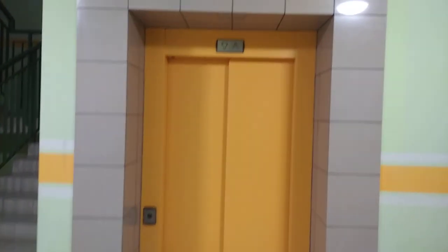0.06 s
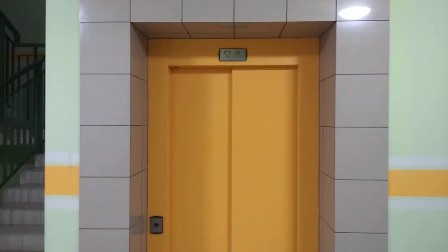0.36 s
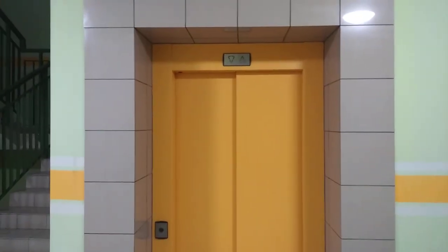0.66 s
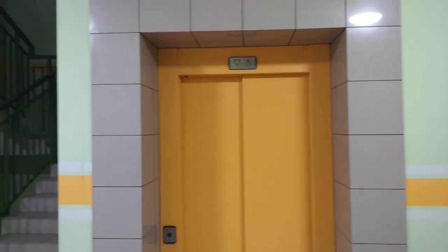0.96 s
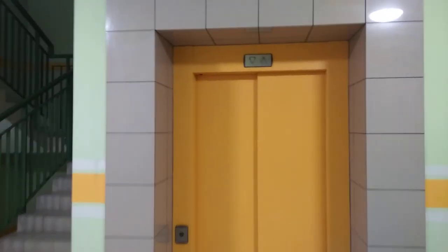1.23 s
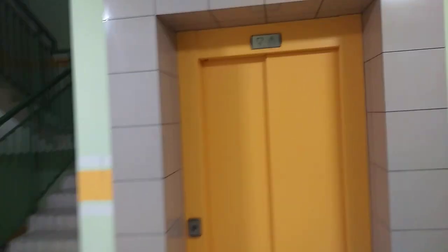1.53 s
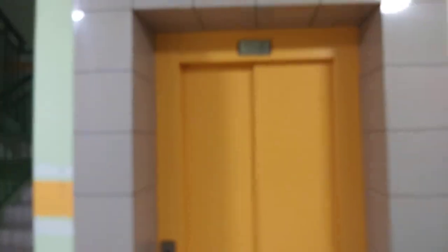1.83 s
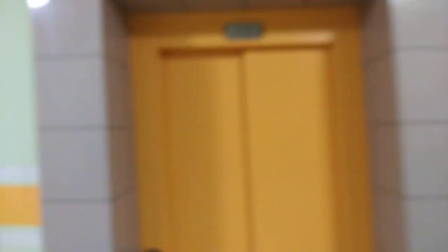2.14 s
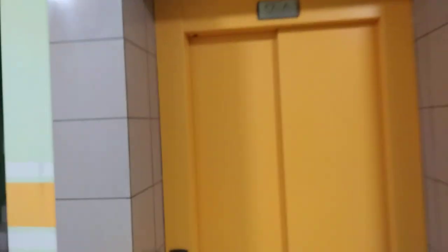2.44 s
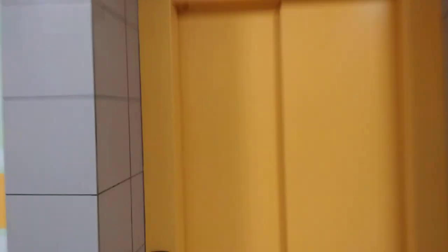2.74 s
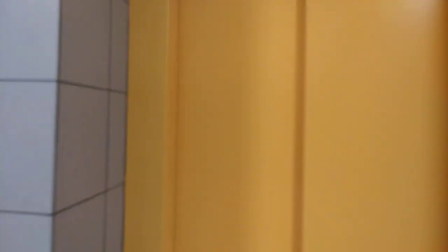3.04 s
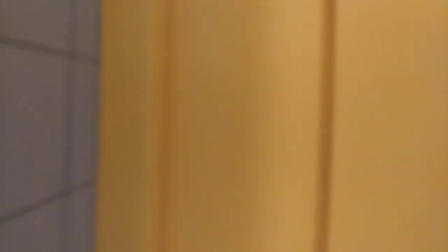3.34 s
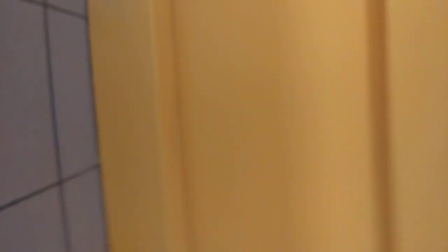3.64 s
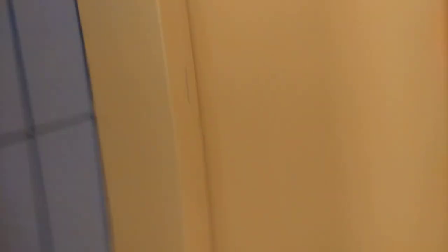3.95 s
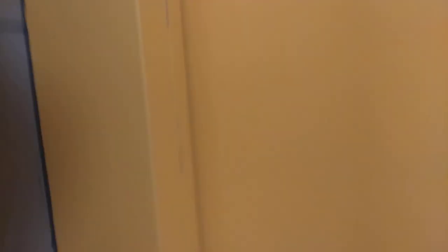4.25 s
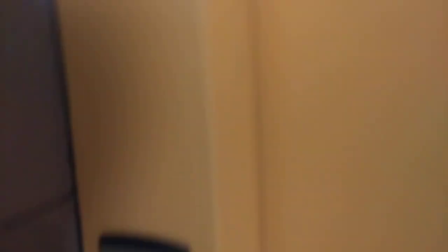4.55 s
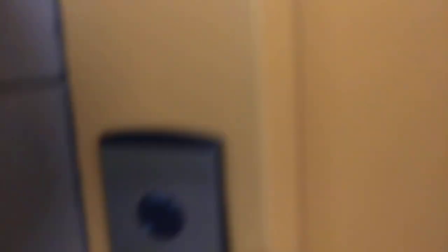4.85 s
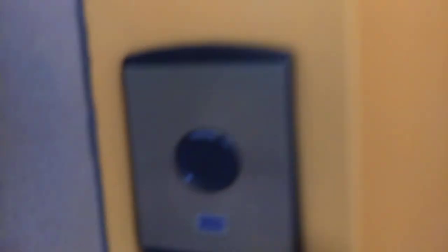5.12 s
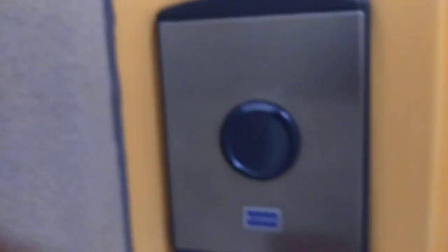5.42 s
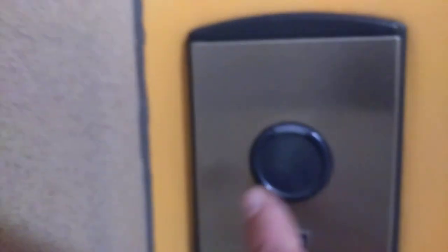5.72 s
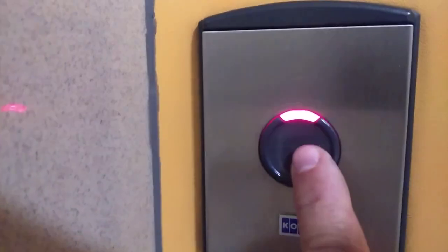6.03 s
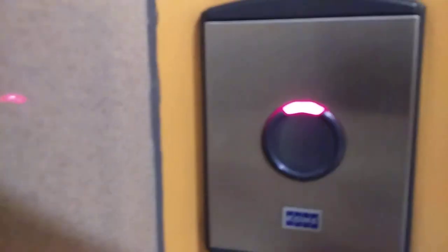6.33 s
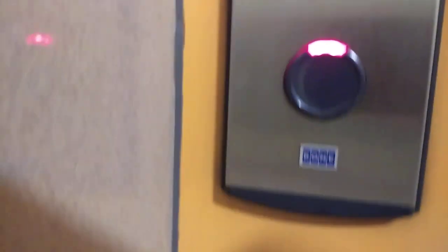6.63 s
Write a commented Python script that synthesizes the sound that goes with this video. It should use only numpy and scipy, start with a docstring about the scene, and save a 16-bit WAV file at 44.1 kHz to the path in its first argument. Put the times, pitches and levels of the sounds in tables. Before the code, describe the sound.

Soft footsteps and rustling clothes, a door banging shut in an echoing stairwell, then a lift button clicking in and out.

```python
"""Door and lift in a tiled stairwell lobby

A hand-held case with two microphone ports is carried up to a lift: shoes thud and scuff, clothes
rustle, fingers tick on the case. A latch strikes, a door bangs shut and the stairwell reverberates.
The call button clicks in and out, and the steel lift frame booms behind it. Impacts are shaped
noise bursts, ringing bodies are sums of damped modes, and friction is modulated noise."""
import sys
import numpy as np
from scipy import signal
from scipy.fft import rfft, irfft, next_fast_len
from scipy.io import wavfile
from scipy.ndimage import uniform_filter1d, map_coordinates

SR = 44100
rng = np.random.default_rng(int(sys.argv[2]) if len(sys.argv) > 2 else 0)


def transcribe(u):
    """Save the signal u as a 16-bit wav file named by the first command-line argument.

    u: samples, shape (n,) or (channels, n), limited to [-1, 1]; the rate is SR.
    q: integer samples, one column per channel.
    """
    v = np.clip(np.atleast_2d(u).T, -1, 1)
    q = np.round(v * 32767).astype(np.int16)
    wavfile.write(sys.argv[1], SR, q)


N = 298998

# Footfalls. Each row: start in seconds, heel level in dB, heel pitch in Hz, sole level in dB,
# sole lag in seconds, trouser swish in dB.
FOOTFALLS = [(0.105, -60.5, 200, -75, 0.027, -71), (0.209, -57, 210, -62, 0.05, -72),
             (2.034, -55.5, 250, -55, 0.049, -62), (2.582, -53.5, 131, -48.5, 0.012, -56.5),
             (3.313, -49.5, 254, -56.5, 0.00802, -52.5), (4.013, -50, 216, -52, 0.063, -52.5),
             (6.655, -40, 125, -49, 0.012, -54)]
# Fingers on the case. Each row: start in seconds, level, bass and treble in dB, decay time in
# seconds, pitch of the touched spot in Hz, its emphasis in dB.
TOUCHES = [(0.9858, -43, 0.5, -8, 0.011, 520, 10), (0.994, -52, 3, -2, 0.012, 1700, 7),
           (1.156, -32.5, 2, 4, 0.0041, 2700, 11), (1.160, -53.5, 4, -15, 0.043, 160, 9),
           (1.358, -55, 10, -20, 0.036, 170, 16), (1.493, -39, 21, 4, 0.016, 600, 13),
           (1.5407, -24.5, -10, -18, 0.0043, 1500, -1), (2.494, -32, 13.5, 5.5, 0.0041, 3000, 4),
           (2.504, -44.5, -2, 6, 0.003, 3000, 1), (2.579, -41, 9, 12, 0.0022, 3000, -3),
           (4.030, -39, -11, 2.5, 0.07, 13200, 12), (4.259, -41, -8, 0, 0.008, 3000, -2),
           (5.913, -52, 11, 3, 0.073, 7000, -4)]


def amp(db):
    """Amplitude ratio of a level in decibels."""
    return 10 ** (np.asarray(db) / 20)


def unit(x):
    """Normalisation to an rms of 1."""
    return x / np.sqrt(np.mean(x ** 2) + 1e-20)


def along(points, hz):
    """Interpolation of (Hz, value) points on a logarithmic frequency axis."""
    freqs, values = np.transpose(points)
    return np.interp(np.log(hz + 1), np.log(freqs + 1), values)


def bump(hz, centre_hz, width_hz):
    """Lorentzian resonance curve, 1 at its centre."""
    return 1 / (1 + (2 * (hz - centre_hz) / width_hz) ** 2)


def shelved(points, bass_db, treble_db, hz):
    """Shelving: a spectrum in dB with its low and high ends raised or lowered."""
    return along(points, hz) + along([(350, bass_db), (1400, 0), (3000, 0.0084), (7000, treble_db)], hz)


def coloured(x, gain_db):
    """Minimum-phase filtering by the curve gain_db(hz); folding the cepstrum makes it causal."""
    n = x.shape[-1]
    m = 2 * next_fast_len(n // 2 + 2048)
    gain = amp(gain_db(np.fft.rfftfreq(m, 1 / SR)))
    cepstrum = irfft(np.log(gain + 1e-6))
    cepstrum[1:m // 2] *= 2
    cepstrum[m // 2 + 1:] = 0
    return irfft(rfft(x, m) * np.exp(rfft(cepstrum)), m)[..., :n]


def noise(gain_db):
    """Stationary stereo noise of rms 1 with the spectral shape gain_db(hz)."""
    return unit(coloured(rng.standard_normal((2, N)), gain_db))


def wobble(rate):
    """Smooth random modulation: a spline through rate knots a second."""
    knots = rng.standard_normal(int(N * rate / SR) + 4)
    return map_coordinates(knots, [np.arange(N) * rate / SR])


def add(track, start_s, x):
    """Superposition of x on the track from start_s."""
    start = max(round(start_s * SR), 0)
    part = x[..., :max(N - start, 0)]
    track[..., start:start + part.shape[-1]] += part


def burst(colour, rise, t60):
    """Impact noise: a flurry of micro-impacts swells, then decays exponentially; times in seconds."""
    t = np.arange(SR // 2) / SR
    envelope = (1 - np.exp(-(t / rise) ** 2)) * amp(-60 * t / t60)
    envelope /= envelope.max()
    flurry = rfft(envelope * rng.standard_normal((2, len(t))), SR)
    # a hard contact drives all frequencies about evenly; the struck body gives the colour
    power = np.abs(uniform_filter1d(np.abs(flurry) ** 2, size=500, axis=1))
    whitened = irfft(flurry / np.sqrt(power + 1e-12), SR)[:, :len(t)]
    x = coloured(whitened, colour)
    return x / np.linalg.norm(x, axis=1, keepdims=True) * np.linalg.norm(envelope)


def ring(modes, spread_hz, attack):
    """Modal decay: each (Hz, dB, T60 in seconds) is a cluster of close modes that beat as they die."""
    t = np.arange(SR) / SR
    out = np.zeros((2, SR))
    for hz, db, t60 in modes:
        knots = rng.standard_normal((2, 256)) + 1j * rng.standard_normal((2, 256))
        beats = np.array([np.interp(t * spread_hz, np.arange(256), k) for k in knots])
        fade = amp(-60 * t / t60) * (1 - np.exp(-t / attack)) * (1 - t)  # tapered to silence at 1 s
        mode = np.real(beats * np.exp(2j * np.pi * hz * t)) * fade
        mode /= np.linalg.norm(mode, axis=1, keepdims=True)
        out += amp(db) * mode * np.linalg.norm(fade) / np.sqrt(2)
    return out


def tail(t60s, seconds):
    """Diffuse field: a stereo response of about unit energy, each frequency dying at its own rate."""
    hz, t, spectra = signal.stft(rng.standard_normal((2, int(seconds * SR))), SR, nperseg=256)
    decay = amp(-60 * t / along(t60s, hz)[:, None])
    _, response = signal.istft(spectra * decay, SR, nperseg=256)
    return response / np.linalg.norm(response[0])


def in_room(x, lobby_db, stairs_db):
    """Coupled rooms: direct sound, then the lobby's short reverberation and the stairwell's long one."""
    # Reverberation of the two spaces. Each row: frequency in Hz, T60 in seconds.
    lobby_t60 = [(100, 0.33), (400, 0.84), (2500, 0.36), (8000, 0.39), (14000, 0.23)]
    stairwell_t60 = [(100, 2.9), (450, 4.56), (1200, 2.5), (2400, 2.54), (4500, 1.7), (8000, 1.19),
                     (14000, 2.04)]
    response = amp(stairs_db) * tail(stairwell_t60, seconds=2)
    response[:, :SR] += amp(lobby_db) * tail(lobby_t60, seconds=1)[:, :SR]
    response = np.pad(response, ((0, 0), (int(0.005 * SR), 0)))  # reflections come 5 ms late
    response[:, 0] = 1  # direct path
    return signal.fftconvolve(x, response, axes=1)


def hush():
    """Ambient noise: the building's broadband background drifts slowly in level."""
    # Spectrum of the hush. Each row: frequency in Hz, level in dB.
    spectrum = [(15, -78), (25, -43.5), (48, -32), (71, -8.5), (93, -2.5), (115, -2.5), (154, -5),
                (219, -3), (769, -12), (1280, -13.5), (2180, -15), (9520, -29), (13800, -28.5),
                (15000, -44.5)]
    # Resonances in it. Each row: centre in Hz, width in Hz, boost in dB.
    resonances = [(205.5, 24, 0), (4520, 150, 4.5)]
    peaks = lambda hz: sum(db * bump(hz, centre, width) for centre, width, db in resonances)
    return amp(-65 + 0.81 * wobble(rate=1)) * noise(lambda hz: along(spectrum, hz) + peaks(hz))


def whistle():
    """Narrow-band noise: a faint, airy whistle comes and goes."""
    # The whistle's envelope. Each row: time in seconds, level in dB.
    envelope = [(0, -69), (0.45, -74), (0.65, -87), (2.9, -80), (3.35, -66), (3.8, -66), (4.3, -78),
                (6.7, -79.5)]
    times, levels_db = np.transpose(envelope)
    level = amp(np.interp(np.arange(N) / SR, times, levels_db))
    return level * noise(lambda hz: 20 * np.log10(bump(hz, centre_hz=2170, width_hz=320)))


def clothes():
    """Friction noise: fabric rustles through the walk and swells as a leg or a sleeve swings past."""
    # Sleeve swishes. Each row: peak time in seconds, level in dB, Gaussian width in seconds.
    sleeves = [(0.03, -64.5, 0.14), (0.215, -57.5, 0.016), (0.272, -62.5, 0.042), (1.29, -56, 0.063),
               (1.38, -63, 0.072), (3.706, -57.5, 0.055), (3.99, -50, 0.019), (4.268, -54, 0.022),
               (4.59, -48, 0.043), (5.2, -53.5, 0.18), (5.859, -70.5, 0.11), (6.699, -39, 0.011),
               (6.741, -47.5, 0.012)]
    # Spectrum of rubbing fabric. Each row: frequency in Hz, level in dB.
    fabric = [(200, -3.5), (900, 1.5), (1700, 3.5), (2150, 6.5), (2700, 1.5), (4600, 1.5), (5100, -7),
              (7600, 1), (9200, -4), (10800, -10), (14000, -9)]
    t = np.arange(N) / SR
    walk_start_s, walk_end_s, fade_s = 1.17, 6.22, 0.99
    level = amp(-61.5) * np.clip(np.minimum(t - walk_start_s, walk_end_s - t) / fade_s, 0, 1)
    swing_lag_s, swing_width_s = 0.15, 0.14  # the other leg passes after each footfall
    legs = [(start + swing_lag_s, db, swing_width_s) for start, *_, db in FOOTFALLS]
    for peak, db, width in legs + sleeves:
        swell = amp(db) * np.exp(-0.5 * ((t - peak) / width) ** 2)
        level = np.hypot(level, swell)  # incoherent sources add in power
    fibres = rng.standard_normal((2, N)) * amp(0.6 * wobble(rate=350))
    return level * unit(coloured(fibres, lambda hz: along(fabric, hz)))


def shoe_contact(pitch_hz, octaves, rise, t60):
    """Damped impact of a shoe on tiles: one broad spectral hump, reaching octaves to either side."""
    hump = lambda hz: -13 * np.log10(1 + (np.log2((hz + 1) / pitch_hz) / octaves) ** 4)
    colour = lambda hz: hump(hz) + along([(40, -17), (100, 0)], hz)
    return in_room(burst(colour, rise, t60), lobby_db=-6, stairs_db=1)


def grit():
    """Poisson impulses: grains of sand crack at random under a sliding sole."""
    # Spectrum of a cracking grain. Each row: frequency in Hz, level in dB.
    grain = [(200, -9.5), (1500, -3.5), (2800, 0), (3700, 5), (4500, -1.5), (5300, -16), (8000, -15),
             (14000, -29.5)]
    grains_per_s, t60 = 370, 0.11
    t = np.arange(SR // 2) / SR
    cracking = rng.random(len(t)) < grains_per_s / SR
    cracks = cracking * rng.standard_normal((2, len(t))) * amp(-60 * t / t60)
    crunch = coloured(cracks, lambda hz: along(grain, hz))
    crunch *= amp(-9.5) * np.sqrt(t60 * SR) / (np.linalg.norm(crunch) + 1e-9)
    return in_room(crunch, lobby_db=-1, stairs_db=2)


def steps():
    """Impact and sliding friction: a low heel thud, a higher sole slap, at times a scuff over grit."""
    # Sliding shoes. Each row: start in seconds, scrape level in dB, grit level in dB, rise in seconds.
    scuffs = [(2.06, -53, -58, 0.045), (2.758, -46, -43.5, 0.0079), (2.958, -55.5, -66, 0.0035),
              (4.238, -57, -55.5, 0.006), (6.686, -55, -58, 0.006)]
    out = np.zeros((2, N))
    for start, heel_db, pitch_hz, sole_db, lag, _ in FOOTFALLS:
        heel = shoe_contact(pitch_hz, octaves=0.99, rise=0.005, t60=0.11)
        sole = shoe_contact(2.5 * pitch_hz, octaves=0.79, rise=0.0027, t60=0.18)
        add(out, start, amp(heel_db) * heel)
        add(out, start + lag, amp(sole_db) * sole)
    for start, scrape_db, grit_db, rise in scuffs:
        add(out, start, amp(scrape_db) * shoe_contact(pitch_hz=1168, octaves=0.47, rise=rise, t60=0.16))
        add(out, start + 0.009, amp(grit_db) * grit())
    return out


def hollow_ring():
    """Lightly damped resonance: each touch on the case leaves a faint ringing; at times metal pings."""
    # Metallic pings. Each row: start in seconds, level in dB, pitch in Hz, T60 in seconds.
    pings = [(0.9854, -45, 1268, 0.027), (1.1668, -41.5, 1284, 0.043), (6.42, -35, 1197, 0.1)]
    t, level = np.arange(N) / SR, np.zeros(N)
    average_db = np.mean([db for _, db, *_ in TOUCHES])
    hollow_t60 = 7.4
    for start, db, *_ in TOUCHES:
        onset_db = -75 + 0.2 * (db - average_db)  # a harder touch rings a little louder
        decay_db = -60 * np.abs(t - start) / hollow_t60
        level = np.hypot(level, amp(onset_db + decay_db) * (t > start))
    out = level * noise(lambda hz: 20 * np.log10(bump(hz, centre_hz=1217, width_hz=130)))
    for start, db, hz, t60 in pings:
        modes = [(hz, 0, t60), (hz, -19, 0.73)]  # the ping and its lingering tail
        add(out, start, amp(db) * ring(modes, spread_hz=29, attack=0.00042))
    return out


def fingers():
    """Structure-borne sound: the case carries finger ticks and a short rub to the microphone ports."""
    # Spectrum of the touched case. Each row: frequency in Hz, level in dB.
    case = [(30, -12), (150, 1), (330, -1), (600, -3.5), (1300, -4), (4400, -7), (5200, -12), (6200, -9),
            (8500, -7.5), (11000, -19.5), (14500, -12.5)]
    out, t = np.zeros((2, N)), np.arange(N) / SR
    coherence = 0.55  # of a tick at the two ports
    for start, db, bass_db, treble_db, t60, spot_hz, spot_db in TOUCHES:
        spot = lambda hz: spot_db * bump(hz, spot_hz, width_hz=0.7 * spot_hz)
        colour = lambda hz: shelved(case, bass_db, treble_db, hz) + spot(hz)
        # a softer touch is slower to rise as well as to die
        left, independent = amp(db) * burst(colour, rise=0.023 * t60, t60=t60)
        right = coherence * left + np.sqrt(1 - coherence ** 2) * independent
        add(out, start, np.array([left, right]))
    # a fingertip drags ever harder, sliding quietly until the skin catches, then lets go
    catch_s, release_s, swell_s = 1.522, 1.542, 0.037
    drag = np.exp(-np.abs(release_s - t) / swell_s) * (t < release_s)
    drag *= np.where(t > catch_s, 1, amp(-9.5))
    out += amp(-39) * drag * noise(lambda hz: shelved(case, bass_db=-2, treble_db=-6.5, hz=hz))
    # the finger passes right over one port, then moves to the other
    side_db = np.interp(t, [1.2, 1.5, 1.6, 2.4], [0, -13, -11.5, 2.5])
    return out * amp([side_db - abs(side_db) / 2, -side_db - abs(side_db) / 2])


def panel_boom():
    """Low plate modes: big steel panels swell into a hum shortly after a blow."""
    # Booms. Each row: start in seconds, low mode level in dB, high mode level in dB, T60 in seconds.
    booms = [(4.419, -41, -35, 0.68), (4.948, -33, -54, 0.45), (6.112, -28.5, -53, 0.11),
             (6.400, -35, -36, 0.7), (6.47, -53, -33.5, 0.53)]
    low_hz, high_hz = 113, 195
    out = np.zeros((2, N))
    for start, low_db, high_db, t60 in booms:
        modes = [(low_hz, low_db, t60), (high_hz, high_db, t60)]
        add(out, start, ring(modes, spread_hz=10, attack=0.046))
    return out


def shaft_knock():
    """Damped low modes: a dull knock behind the lift doors answers the call."""
    modes = [(302, 3.5, 0.053), (322, -14, 0.42), (191, -12.5, 0.5)]
    out = np.zeros((2, N))
    add(out, 6.696, amp(-28) * ring(modes, spread_hz=12, attack=0.0029))
    return out


def button():
    """Snap action: the switch clicks in and out, exciting its spring, its housing and the lift frame."""
    # Switch contacts. Each row: start in seconds, level, bass, treble and cap clack in dB, decay time
    # in seconds, spring and frame ring in dB, favoured frame pitch in Hz.
    contacts = [(6.12, -38.5, 10, -32, 9, 0.02, -44, -55, 113),
                (6.147, -37.5, 14, -15, -5, 0.042, -45, -48.5, 680),
                (6.157, -32, 17.5, 0.5, 8, 0.029, -34, -49, 660),
                (6.1943, -16, 3, 6.5, 4.5, 0.012, -22, -39.5, 244),
                (6.203, -31.5, 7, -12, -11, 0.057, -40, -43, 1000),
                (6.3658, -23, -19, 8, -1, 0.0097, -25, -52, 1140),
                (6.3685, -14, -25, 2.5, 11.5, 0.011, -17.5, -41.5, 367)]
    # Spectra of the switch and its rattling housing. Each row: frequency in Hz, level in dB.
    switch = [(30, -50), (150, 6.5), (400, -8), (700, 1.5), (1500, 2), (3000, 0.5), (3900, 2.5),
              (4600, -1.5), (5200, -12), (5900, -4.5), (6700, -8), (7400, 6), (8100, 1.5), (9000, -3),
              (10200, -17.5), (12700, -14), (14500, -12)]
    housing = [(30, -32), (150, 7), (400, -0.5), (700, 1), (1300, -1.5), (1900, 0.5), (3200, -2),
               (4600, -5), (5400, -10), (7800, -15), (10200, -22), (14500, -28)]
    # Partials of the spring. Each row: frequency in Hz, level in dB.
    spring_partials = [(3160, 5), (4700, 6.5), (6000, 2), (7380, 7)]
    # Modes of the steel lift frame. Each row: frequency in Hz, level in dB, T60 in seconds.
    frame_modes = [(112.6, -3.5, 1), (195.4, -7, 0.94), (241, -7.5, 0.81), (359, -10, 0.57),
                   (535, -5, 0.35), (595, -1, 0.25), (683, -1, 0.28), (802, -3.5, 0.4), (957, -2.5, 0.28),
                   (1040, -2, 0.35), (1125, -2, 0.32), (1223, 0, 0.32)]
    spring_t60, favour_db = 0.035, 12.5
    spring_modes = [(hz, level, spring_t60) for hz, level in spring_partials]
    out = np.zeros((2, N))
    for start, db, bass_db, treble_db, cap_db, t60, spring_db, frame_db, favoured_hz in contacts:
        # the plastic cap clacks hardest when it flies back against its stop
        cap = lambda hz: cap_db * bump(hz, centre_hz=2470, width_hz=3400)
        snap = burst(lambda hz: shelved(switch, bass_db, treble_db, hz) + cap(hz), rise=0.00055, t60=t60)
        rattle = amp(-15) * burst(lambda hz: along(housing, hz), rise=0.0035, t60=0.13)
        # pushing and letting go each favour different modes of the frame
        driven_modes = [(hz, level + favour_db * bump(hz, favoured_hz, width_hz=80), decay)
                        for hz, level, decay in frame_modes]
        add(out, start, amp(db) * in_room(snap, lobby_db=-19, stairs_db=-24))
        add(out, start, amp(db) * in_room(rattle, lobby_db=-8, stairs_db=-10))
        add(out, start, amp(db + spring_db) * ring(spring_modes, spread_hz=40, attack=0.00076))
        add(out, start, amp(frame_db) * ring(driven_modes, spread_hz=28, attack=0.011))
    return out


def door():
    """Impact excitation: the latch rides over the strike plate; the leaf slams, rebounds and rings."""
    # Door contacts. Each row: start in seconds, level, bass and treble in dB, cutoff in Hz, rise and
    # decay time in seconds, then leaf ring, latch ring, lobby and stairwell reverberation in dB.
    contacts = [(4.416, -23, 2, 0, 8000, 0.00032, 0.057, -28.5, -0.5, -7.5, -6.5),
                (4.6226, -18.5, 2, -11, 9500, 0.0015, 0.044, -40.5, -3, -22, -10),
                (4.6379, -10.5, 1, 3.5, 12500, 0.00033, 0.039, -19.5, -28, -5.5, -8),
                (4.646, -19.5, 4, 4.5, 12500, 0.00034, 0.058, -30.5, -28.5, -7.5, -14)]
    # Spectrum of a blow on the door. Each row: frequency in Hz, level in dB.
    spectrum = [(30, -27.5), (135, -1), (200, 5.5), (275, -0.5), (340, 1.5), (480, 0.5), (620, 0.5),
                (1050, 0.5), (1400, -3), (1850, 2.5), (2400, 4.5), (4650, -1.5), (5050, -9.5), (5800, -6.5),
                (8000, -5), (9800, -8), (10800, -20.5), (13000, -15), (14500, -25)]
    # Modes of the leaf, and of the latch with its plate. Each row: frequency in Hz, level in dB,
    # T60 in seconds.
    leaf_modes = [(203, 3.5, 0.12), (344.6, 5.5, 0.4), (497.3, 4.5, 0.16), (692, -7.5, 0.46),
                  (798, -1, 0.54), (1170, -5.5, 0.51), (1885, -1.5, 0.32), (2285, -2, 0.36),
                  (2540, 1, 0.18), (2730, -1.5, 0.19), (2880, -7, 0.45), (3570, 0.5, 0.2),
                  (3840, -3.5, 0.49), (4670, -1, 0.18), (6540, -7, 0.22), (9300, -7, 0.12)]
    latch_modes = [(622, -19, 0.051), (875, -6, 0.055), (1034, -8, 0.061), (1426, 1, 0.066),
                   (1863, 1.5, 0.034), (2080, 7.5, 0.043), (2490, -4, 0.077), (4490, -3, 0.04)]
    out = np.zeros((2, N))
    for (start, db, bass_db, treble_db, cutoff_hz, rise, t60,
         leaf_db, latch_db, lobby_db, stairs_db) in contacts:
        # a gentler contact reaches less far into the treble
        rolloff = lambda hz: 10 * np.log10(1 + (hz / cutoff_hz) ** 10)
        colour = lambda hz: shelved(spectrum, bass_db, treble_db, hz) - rolloff(hz)
        blow = burst(colour, rise, t60)
        leaf = amp(leaf_db) * ring(leaf_modes, spread_hz=32, attack=0.0025)
        latch = amp(latch_db) * ring(latch_modes, spread_hz=73, attack=0.0015)
        add(out, start, amp(db) * in_room(blow, lobby_db, stairs_db))
        add(out, start, amp(db) * in_room(leaf + latch, lobby_db=-18, stairs_db=-11.5))
        # the metal parts graze just before they meet
        add(out, start - 0.003, amp(db - 21.5) * burst(colour, rise=0.0012, t60=0.014))
    return out


def scene():
    """Spatial coherence: the sources add, and the two close ports hear long waves alike."""
    # Likeness of left and right. Each row: frequency in Hz, coherence from 0 to 1.
    port_coherence = [(150, 0.83), (350, 0.72), (700, 0.35), (1400, 0.061), (12000, 0)]
    impacts = door() + panel_boom() + button() + shaft_knock() + steps()
    left, independent = impacts + clothes() + hollow_ring() + whistle() + hush()
    coherence = along(port_coherence, np.fft.rfftfreq(N, 1 / SR))
    right = irfft(coherence * rfft(left) + np.sqrt(1 - coherence ** 2) * rfft(independent), N)
    return np.array([left, right]) + fingers()


def record(dry):
    """Microphone frequency response: the right port is weak in the bass, and both are band-limited."""
    # Response of the right port. Each row: frequency in Hz, gain in dB.
    right_port = [(40, -27), (110, -13), (340, -15), (470, -0.5), (1000, 0), (2200, -2.5), (4500, 0.5),
                  (8000, 1), (13000, -4)]
    cutoff_hz = 14400
    m = next_fast_len(N + SR // 2)
    hz = np.fft.rfftfreq(m, 1 / SR)
    ports = np.array([np.ones_like(hz), amp(along(right_port, hz))])
    band_limit = 1 / np.sqrt(1 + (hz / cutoff_hz) ** 160)
    return irfft(rfft(dry, m) * ports * band_limit, m)[:, :N]


dry = scene()
out = record(dry)
transcribe(out)
```